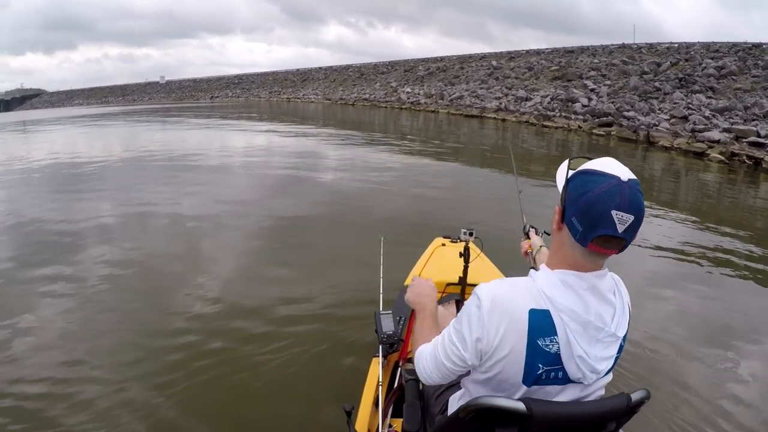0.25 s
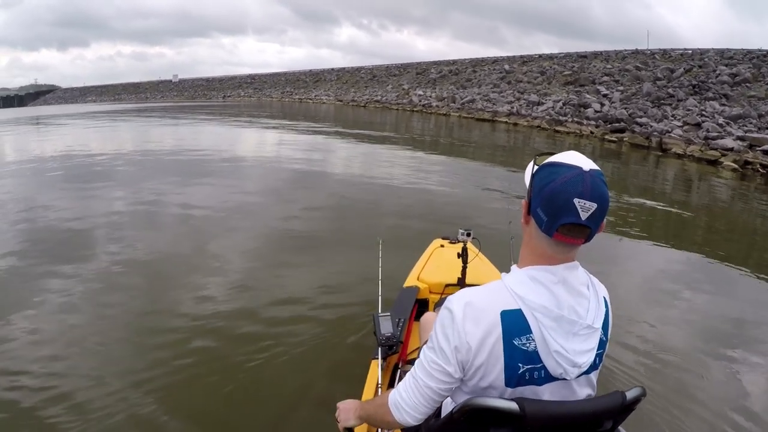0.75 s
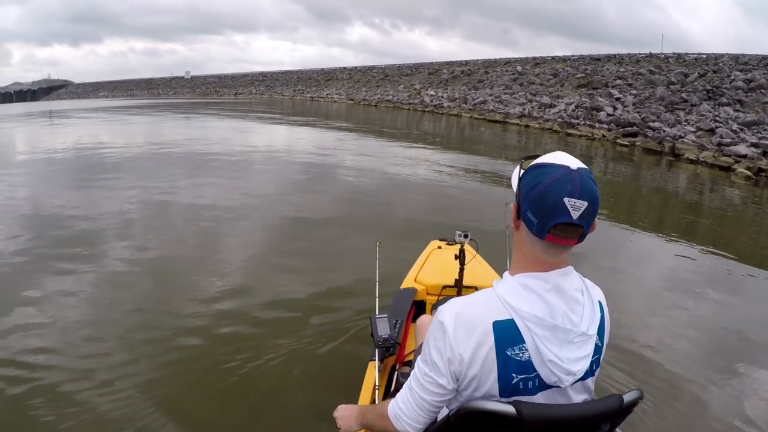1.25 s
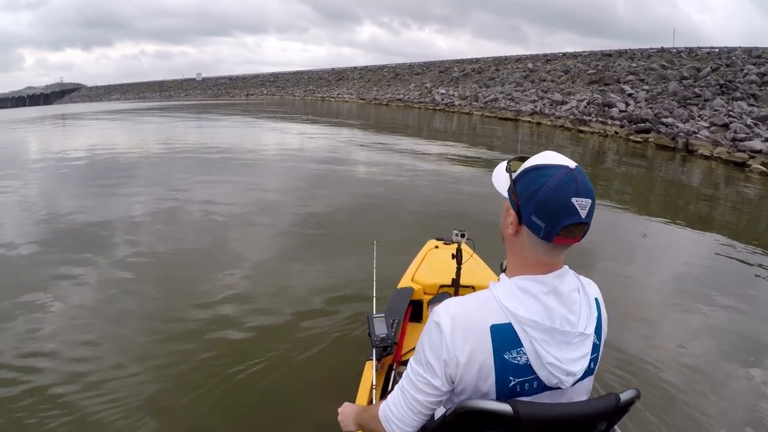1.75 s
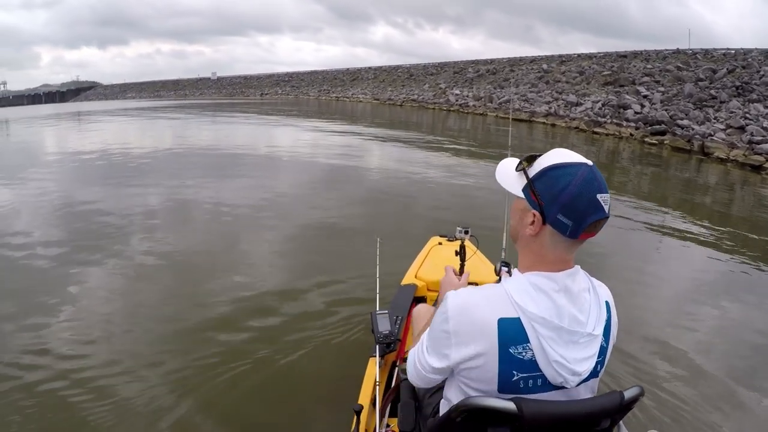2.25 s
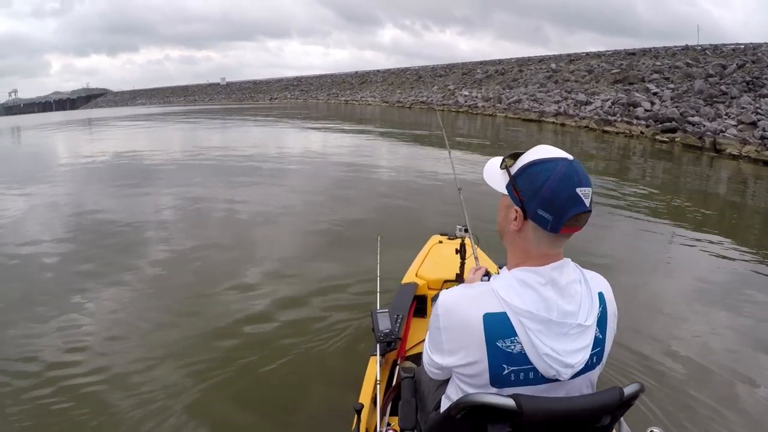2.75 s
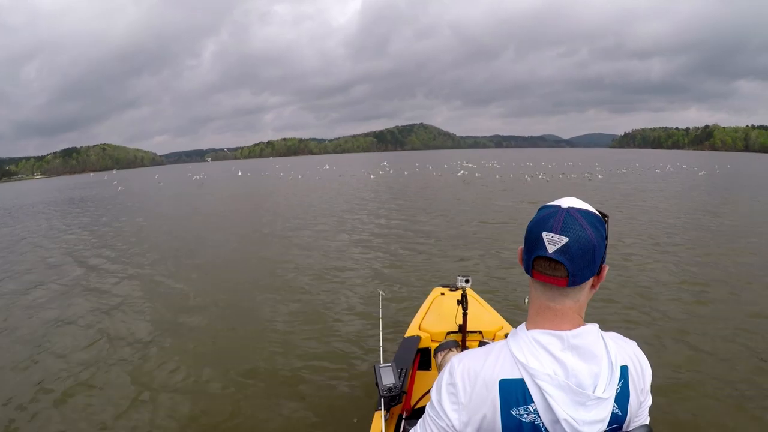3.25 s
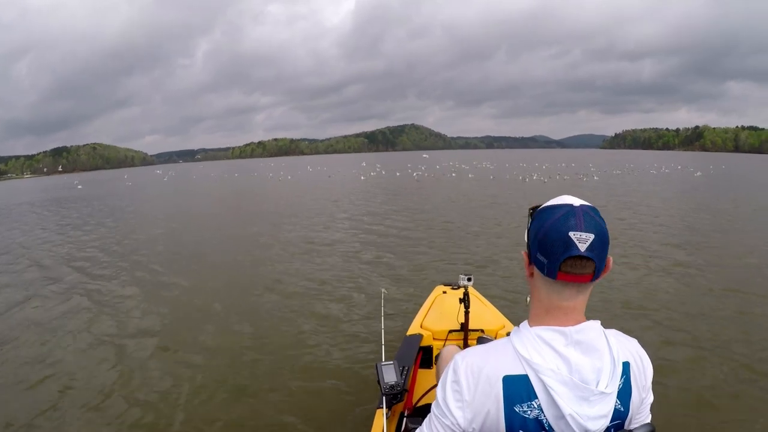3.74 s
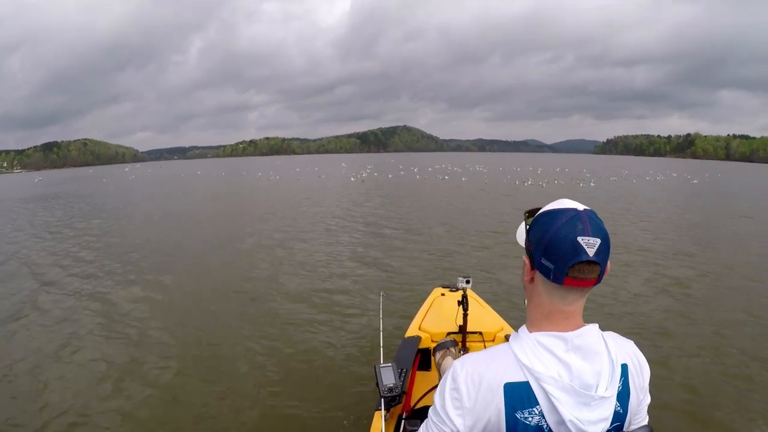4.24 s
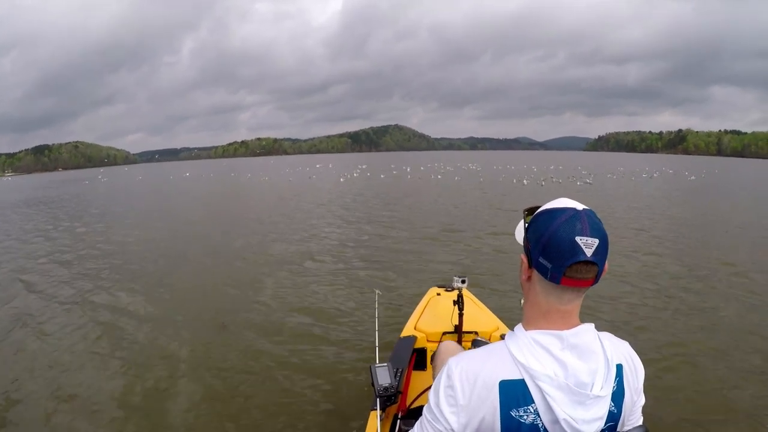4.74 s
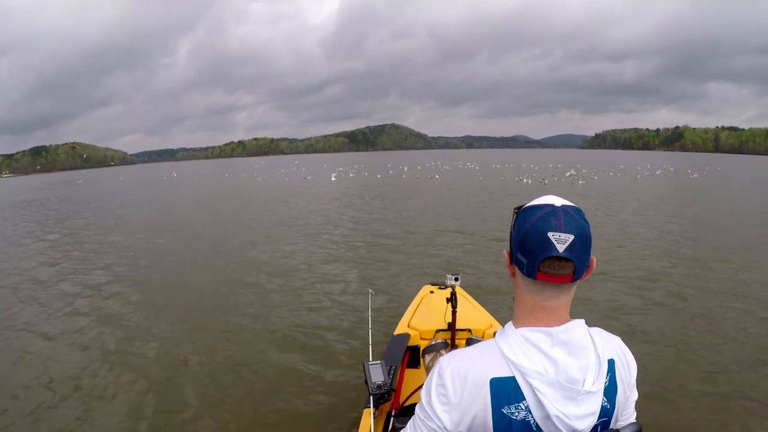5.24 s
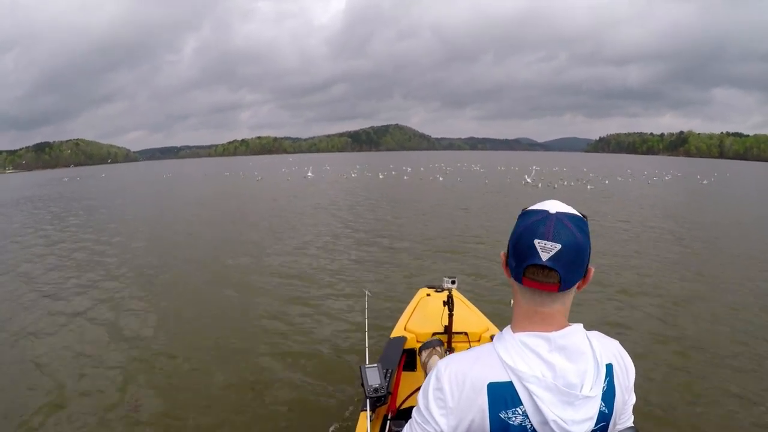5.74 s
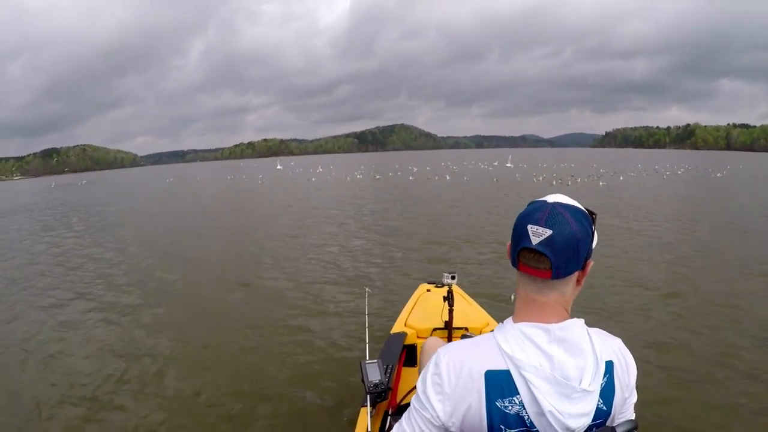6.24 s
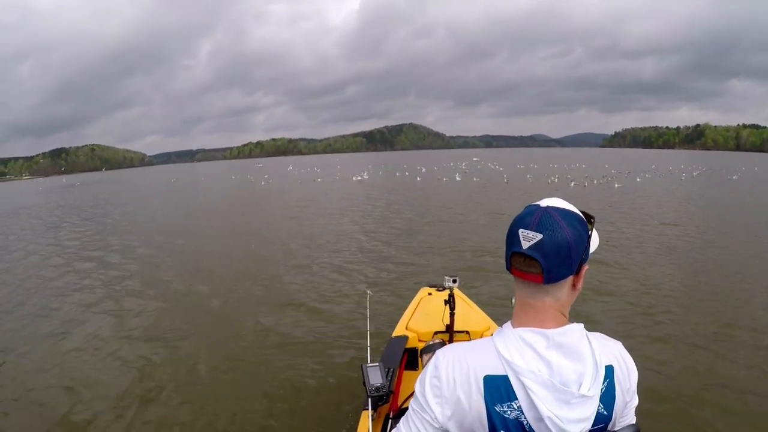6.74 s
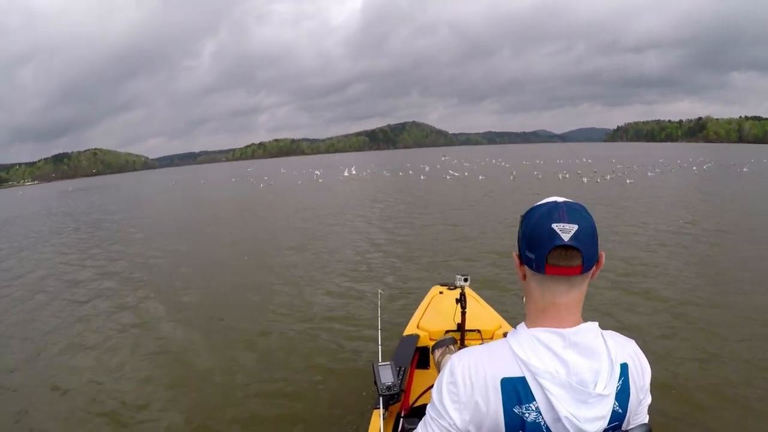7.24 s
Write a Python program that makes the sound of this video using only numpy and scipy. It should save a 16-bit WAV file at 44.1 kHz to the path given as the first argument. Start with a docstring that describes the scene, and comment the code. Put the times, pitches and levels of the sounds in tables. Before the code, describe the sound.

An angler shifts in a creaking hollow kayak; a reel catch clacks sharply, then an abrupt cut to livelier dripping water, bubbles and low wind buffeting.

```python
"""Kayak on calm water

An angler shifts in a plastic kayak: stick-slip creaks of the seat ring the hull as decaying modes, gear knocks
the deck, bright ticks are bands of noise, and the reel's catch rings metal. A sudden step clicks and recovers.
Water is noise, damped drops and bubble tones; far gulls are faint harmonic tones; light wind is slow low noise
at the microphone."""
import sys
import numpy as np
from scipy import signal
from scipy.fft import rfft, irfft, next_fast_len
from scipy.io import wavfile
from scipy.ndimage import uniform_filter1d, map_coordinates

SR = 44100
rng = np.random.default_rng(int(sys.argv[2]) if len(sys.argv) > 2 else 0)


def inscribe(sig):
    """Save sig as 16-bit PCM at rate SR to the path in sys.argv[1].

    A 1-D sig is mono; a 2-D sig holds one channel per row.
    Samples are clipped to [-1, 1] before scaling.
    """
    pcm = np.round(np.clip(np.atleast_2d(sig).T, -1, 1) * 32767)
    wavfile.write(sys.argv[1], SR, pcm.astype(np.int16))


N = 330309  # length [samples]

# one sudden step of the waveform: (time [s], peak level [dB], recovery time constant [s])
STEP = (3.1886, -27.5, 0.0083)


def amp(db):
    """Amplitude ratio: 20 dB is a factor of ten."""
    return 10 ** (np.asarray(db) / 20)


def unit(x):
    """Normalization: x scaled to rms 1."""
    return x / np.sqrt(np.mean(x ** 2) + 1e-20)


def curves(rows):
    """Linear interpolation: one value per sample for each column after the time."""
    s, *cols = np.transpose(rows)
    return [np.interp(np.arange(N) / SR, s, c) for c in cols]


def wobble(rate):
    """Slow random modulation: a smooth curve through rate random knots a second."""
    knots = rng.standard_normal(int(N * rate / SR) + 4)
    return map_coordinates(knots, [np.arange(N) * rate / SR])


def even(x, window_s):
    """Gain control: x with its chance swells levelled over the window, rms 1."""
    power = uniform_filter1d(x ** 2, size=int(window_s * SR))
    return unit(x / np.sqrt(np.abs(power) + .05))


def filtered(x, response):
    """Linear filtering: the spectrum of x times a response of frequency."""
    m = next_fast_len(len(x) + SR)  # zero padding leaves room for the tail
    return irfft(rfft(x, m) * response(np.fft.rfftfreq(m, 1 / SR)), m)[:len(x)]


def coloured(x, spectrum):
    """Spectral shaping: x follows (frequency [Hz], level [dB]) points on a log axis, rms 1."""
    f, db = np.transpose(spectrum)
    return unit(filtered(x, lambda hz: amp(np.interp(np.log(hz + .1), np.log(f + .1), db))))


def rush(spectrum, patchy_db):
    """Turbulent noise: rms 1, with patches of random gain in time and frequency."""
    z = signal.stft(rng.standard_normal(N + 512), nperseg=512)[2]
    field = uniform_filter1d(rng.standard_normal(z.shape), size=6, axis=0)
    field = uniform_filter1d(field, size=10, axis=1)
    patchy = signal.istft(z * amp(patchy_db * unit(field)), nperseg=512)[1][:N]
    return coloured(patchy, spectrum)


def band(centre_hz, width_hz):
    """Band-limited noise: one broad resonance, rms 1."""
    return unit(filtered(rng.standard_normal(N), lambda hz: 1 / (1 + ((hz - centre_hz) / width_hz) ** 4)))


def add(track, s, db, sound):
    """Superposition: mixes a sound in at time s with the given peak level."""
    part = track[round(s * SR):][:len(sound)]
    part += amp(db) * sound[:len(part)] / np.max(np.abs(sound))


def ring(modes, tilt_db, scatter_db, lag):
    """Modal decay with dispersion: bending waves are slower at low pitch, so low modes swell later."""
    hz, db, t60 = np.transpose(modes)[:, :, None]
    t = np.arange(SR // 8) / SR
    # tilt in dB per octave about 900 Hz, a random level for each mode
    level = db + tilt_db * np.log2(hz / 900) + scatter_db * rng.standard_normal(hz.shape)
    swell = 1 - np.exp(-(t * hz / lag) ** 2)  # lag in cycles
    return np.sum(amp(level - 60 * t / t60) * swell * np.sin(2 * np.pi * hz * t), axis=0)


def droplets(rate, pitch_hz, cycles, spread_db, rise):
    """Damped oscillators at random times, rate a second, a few much larger than the rest; rms 1."""
    when, pitch, size = rng.random((3, int(rate * N / SR), 1))
    hz = pitch_hz * 3 ** (2 * pitch - 1)  # from a third to three times the middle pitch
    k = np.arange(800)
    age = k * hz / SR  # in cycles
    grain = amp(-spread_db * np.log(size + 1e-4)) * np.exp(-age / cycles) * (1 - np.exp(-age))
    grain *= np.sin(2 * np.pi * age * (1 + rise * age / cycles))
    start = (when * N).astype(int)
    return unit(np.bincount((start + k).ravel(), grain.ravel(), N + 800)[:N])


def seat():
    """Stick-slip: each slip of the seat frame cracks and strikes the hull at nearly the same spot."""
    # slips of the frame: (time [s], peak level [dB])
    slips = [(.207, -46.5), (.244, -43), (0.301, -42.5), (.36, -44.5), (.403, -45), (.432, -41.5),
             (.457, -41), (.48, -43), (.504, -39.5), (.529, -41), (.554, -39.5), (.578, -40), (0.604, -39),
             (0.635, -37.5), (0.721, -37), (.833, -42.5), (0.945, -45.5), (1.8, -45.5), (1.824, -47),
             (1.922, -44), (2.145, -52), (2.176, -46.5), (2.228, -43.5), (2.466, -41), (2.504, -42),
             (2.536, -41.5), (2.57, -42.5), (2.616, -47.5), (2.676, -51), (2.727, -48.5), (2.773, -45),
             (2.836, -45), (3.255, -45), (3.325, -46), (3.39, -44.5), (3.419, -45.5), (3.444, -43),
             (3.532, -41), (3.875, -44.5), (3.946, -45.5), (4.055, -41), (4.452, -47), (4.491, -45.5),
             (4.555, -47.5), (4.617, -44.5), (4.66, -47), (4.698, -44.5), (4.715, -44), (4.766, -42),
             (5.122, -41), (5.148, -43.5), (5.176, -42.5), (5.243, -44), (5.306, -50), (5.34, -57),
             (5.407, -42.5), (5.843, -54), (5.879, -51), (5.898, -43), (5.978, -43.5), (6.044, -44),
             (6.104, -39.5), (6.155, -42), (6.242, -40.5), (6.574, -44), (6.604, -45.5), (6.637, -47),
             (6.685, -44), (6.733, -42.5), (6.784, -42), (6.866, -39), (6.915, -41.5), (6.957, -37),
             (6.974, -38), (6.995, -40), (7.072, -43), (7.457, -47)]
    # modes of the hull: (frequency [Hz], relative level [dB], t60 [s])
    hull = [(325, -6.5, 0.068), (472.7, 0.5, 0.059), (549, 0.5, 0.06), (657, 2, 0.045), (882.4, 3.5, 0.042),
            (1084.7, 5.5, 0.033), (1232, 10, 0.018), (1408, 6, 0.023), (1810, 5, 0.0098), (2156, -7, 0.025),
            (2460, -8, 0.021), (3000, -10, 0.018), (3680, -13, 0.024), (4200, -17, 0.017)]
    # colour before and after the step: (brightness [dB per octave], boost below 800 Hz [dB])
    slip_colour = [(0, 3.5), (-3, -2.5)]
    out, t = np.zeros(N), np.arange(SR // 8) / SR
    for s, db in slips:
        tilt_db, boom_db = slip_colour[int(s > STEP[0])]
        modes = [(hz, level + boom_db * (hz < 800), t60) for hz, level, t60 in hull]
        body = ring(modes, tilt_db, scatter_db=1.2, lag=2.2)
        noise = uniform_filter1d(rng.standard_normal(len(t)), size=5)
        crack = amp(rng.normal(-8, 1.5) - 60 * t / .009) * noise
        add(out, s, db, body / np.max(np.abs(body)) + crack)
    return out


def knocks():
    """Convolution of force and response: gear scuffs the deck at varying spots and excites its modes."""
    # soft knocks: (time [s], peak level [dB], brightness [dB per octave], scuff decay time constant [s],
    # favoured pitch [Hz])
    knock_rows = [(1.268, -42, -4, 0.0046, 700), (1.573, -47.5, -2, 0.0022, 2000),
                  (1.585, -40, -2, 0.0026, 420), (1.602, -36, -1, 0.0058, 700),
                  (1.62, -47.5, -2, .005, 250), (1.63, -48, -8, 0.0046, 650),
                  (1.899, -45.5, -7.5, 0.0047, 398), (1.916, -45.5, -1, 0.0033, 704),
                  (1.982, -47, 3, 0.0033, 750), (2.341, -39, 2.5, 0.00082, 1500),
                  (3.62, -40.5, -6, 0.011, 345), (3.818, -36, -2.5, 0.0014, 1580),
                  (3.822, -37.5, -3, 0.00083, 680), (3.833, -48, -2, 0.0019, 600),
                  (4.143, -43.5, -2, 0.0047, 495), (4.265, -51.5, 0, 0.0068, 400),
                  (5.936, -40, -3, 0.0016, 900), (6.348, -47, -5, 0.0033, 480),
                  (6.363, -29, -2, 0.0013, 523), (6.369, -38, 0, 0.00083, 1700),
                  (6.375, -35, -7, 0.0026, 678.5), (6.387, -39, -1, .003, 600),
                  (6.399, -43.5, -3.5, 0.0026, 750), (6.406, -46, -7, 0.0031, 500),
                  (7.223, -46, 0, .003, 1000), (7.23, -39.5, 2, 0.0017, 1150), (7.462, -49, -6, .003, 380),
                  (7.482, -45, 4, .002, 1100)]
    # modes of the deck: (frequency [Hz], relative level [dB], t60 [s])
    deck = [(203.6, -4.5, 0.059), (270.5, -3, 0.09), (413, 1.5, 0.069), (500, -1.5, 0.064),
            (686, 1.5, 0.037), (793, -4.5, 0.052), (954, -4.5, 0.039), (1145, -2.5, 0.014),
            (1660, -10, 0.019), (1943, -3.5, 0.017), (2730, -17.5, 0.013), (3440, -9, 0.015),
            (4970, -18, .01)]
    detune = .04  # random share by which the modes shift with the struck spot
    favour_db, favour_octaves = 7, .5  # boost of the modes near the favoured pitch, and its reach
    rub_gain_db, rub_s = -4, .008  # ragged noise of the contact: mid gain, decay time constant
    out, t = np.zeros(N), np.arange(SR // 25) / SR
    for s, db, tilt_db, length, favoured_hz in knock_rows:
        scuff = rng.standard_normal(len(t)) * np.exp(-t / length)
        ragged = rng.standard_normal(len(t) // 64 + 1).repeat(64)[:len(t)]
        noise = uniform_filter1d(uniform_filter1d(rng.standard_normal(len(t)), size=17), size=9)
        rub = 2 * noise * amp(rub_gain_db + 4 * ragged) * np.exp(-t / rub_s)
        spot = []
        for hz, level, t60 in deck:
            favour = favour_db * np.exp(-(np.log2(hz / favoured_hz) / favour_octaves) ** 2)
            spot.append((hz * (1 + detune * rng.standard_normal()), level + favour, t60))
        body = signal.fftconvolve(scuff, ring(spot, tilt_db, scatter_db=1.2, lag=.6))
        add(out, s, db, body / np.max(np.abs(body)) + np.pad(rub, (0, len(body) - len(t))))
    return out


def ticks():
    """Damped band noise: tackle and droplets tick as short bright cracks, each in its own band."""
    # ticks: (time [s], starting rms level [dB], centre [Hz], spread [octaves]); gain is 1/e at twice the spread
    tick_rows = [(0.156, -55, 13500, 0.28), (0.9768, -50, 3800, 0.81), (1.051, -57.5, 6170, 0.55),
                 (1.27, -57.5, 3900, 0.42), (1.374, -58.5, 4900, 0.39), (1.571, -49.5, 4540, 0.31),
                 (1.582, -56, 4800, 0.26), (1.589, -61, 4500, 0.66), (1.599, -47.5, 5070, 0.77),
                 (1.618, -55, 5300, 0.38), (1.641, -62, 4100, 0.34), (1.742, -60, 5500, 0.4),
                 (1.992, -59, 4700, 1), (2.007, -59, 9800, 0.2), (2.342, -53, 4600, 0.46),
                 (3.419, -59, 4900, 0.8), (3.5516, -56, 5000, 0.76), (3.626, -54.5, 5300, 0.75),
                 (3.8186, -52, 5400, 0.87), (4.1695, -55, 8400, 0.82), (4.377, -59.5, 3460, 0.32),
                 (4.449, -58, 3700, 0.54), (4.545, -60, 4700, 0.11), (4.715, -54, 4600, 1),
                 (4.742, -60, 4500, 0.31), (4.8623, -61, 3800, 0.83), (5.0325, -49, 14200, 0.12),
                 (5.165, -59, 4500, 0.41), (5.187, -55, 5100, 0.9), (5.196, -51, 3460, 0.3),
                 (5.225, -50.5, 4480, 0.35), (5.234, -49.5, 3900, 0.76), (5.2612, -53.5, 3800, 0.8),
                 (5.301, -54, 4150, 0.27), (5.311, -53, 7200, 0.36), (5.343, -57, 4400, 0.57),
                 (5.389, -57, 4900, 0.98), (5.411, -58, 3800, 0.82), (5.479, -64, 4900, 0.12),
                 (5.7908, -58, 4050, 0.71), (5.825, -53, 6200, 0.2), (5.8435, -55, 3900, 0.88),
                 (6.354, -50, 4200, 0.39), (6.3615, -52, 3700, 0.66), (6.369, -48, 4300, 0.86),
                 (6.385, -57, 4500, 0.37), (6.449, -54, 7600, 0.77), (6.471, -55, 9700, 0.83),
                 (6.479, -56, 6300, 0.36), (6.5643, -54.5, 4440, 0.6), (6.866, -57, 3800, 0.7),
                 (6.954, -60, 3900, 0.69), (7.055, -61, 3500, 0.27), (7.0808, -50, 6700, 1.1),
                 (7.097, -53.5, 5400, 0.51), (7.112, -57, 6000, 0.98), (7.231, -52, 4700, 0.76),
                 (7.294, -59, 5260, 0.91), (7.451, -56, 6300, 0.55)]
    out, t = np.zeros(N), np.arange(1024) / SR
    hz = np.fft.rfftfreq(len(t), 1 / SR) + 1
    for s, db, centre_hz, octaves in tick_rows:
        bell = np.exp(-(np.log2(hz / centre_hz) / octaves / 2) ** 2)
        crack = irfft(rfft(rng.standard_normal(len(t))) * bell)
        out[round(s * SR):][:len(t)] += amp(db - 60 * t / .021) * unit(crack)  # t60 of 0.021 s
    return out


def step_click():
    """Exponential relaxation: a sudden step clicks and recovers."""
    out = np.zeros(N)
    s, db, recovery = STEP
    add(out, s, db, np.exp(-np.arange(SR // 5) / SR / recovery))
    return out


def reel_catch():
    """Modal ringing: the catch lifts and drops, sounding the metal frame with a noisy rattle."""
    # the lift and the drop: (time [s], peak level [dB])
    snaps = [(2.956, -41.5), (2.9702, -7)]
    # modes of the metal frame: (frequency [Hz], relative level [dB], t60 [s])
    frame = [(603, -20, 0.029), (1030, -24, .04), (1920, -35.5, 0.11), (2100, -24, .03), (2660, -8, 0.021),
             (3430, -20, 0.028), (3640, -11, 0.023), (4280, -16.5, 0.014), (4565, -10.5, 0.016),
             (5420, -15.5, 0.019), (6390, 9, 0.012), (6750, -15.5, 0.0354), (7980, -25.5, 0.024),
             (8400, -5, 0.014), (8560, -5.5, 0.019), (10070, -11.5, .022), (11240, -8, 0.0097),
             (13400, -10, 0.00486), (14000, -4, 0.025)]
    out, t = np.zeros(N), np.arange(SR // 8) / SR
    for s, db in snaps:
        metal = ring(frame, 0, scatter_db=.8, lag=.3)
        bright_noise = np.convolve(rng.standard_normal(len(t)), [1, 0, -1], "same")
        add(out, s, db, metal + amp(-5 - 60 * t / .028) * bright_noise)
    return out


def reel_whirr():
    """Resonant noise: the spool whirrs near the frame's main mode, swelling quickly and then fading."""
    start_s, level_db, rise_s, fade_db_per_s = 3.08, -67, .015, 50
    now = np.arange(N) / SR
    turning = np.clip((now - start_s) / rise_s, 0, 1) * (now < STEP[0])
    gain = amp(level_db - fade_db_per_s * np.abs(now - start_s))
    return turning * gain * band(centre_hz=6600, width_hz=480)


def thin_hiss():
    """Band-limited noise: a thin high hiss in two bands fades out early."""
    end_s, fade_s, high_db, low_db = 0.59, 0.32, -67, -76.5
    running = np.clip((end_s - np.arange(N) / SR) / fade_s, 0, 1)
    high = amp(high_db) * band(centre_hz=14400, width_hz=1200)
    low = amp(low_db) * band(centre_hz=8340, width_hz=990)
    return running * (high + low)


def hull_water():
    """Turbulence and drop resonance: wash and hiss along the hull, sprinkled with damped drops."""
    # wash along the hull: (time [s], level before lapping [dB])
    wash_levels = [(0, -61), (.5, -62.5), (1.04, -62.5), (1.96, -62), (2.4, -62.5), (2.7, -61), (3.38, -64),
                   (4.0, -69), (4.4, -67.5), (5.0, -67.5), (5.3, -66), (5.6, -65.5), (6.34, -66),
                   (6.94, -62.5), (7.49, -66)]
    # wash spectrum: (frequency [Hz], relative level [dB per Hz])
    wash_spectrum = [(210, -21), (350, -4.5), (450, -7), (590, -7), (725, -10.5), (845, -13.5), (3000, -22),
                     (3900, -48), (6600, -120)]
    # hiss spectrum: (frequency [Hz], relative level [dB per Hz])
    hiss_spectrum = [(1290, -39.5), (2200, -24), (3220, -1), (5220, -1.5), (5860, -2.5), (12600, -2.5),
                     (14700, -3), (15300, -15), (16000, -35)]
    wash_db, = curves(wash_levels)
    hiss_db = -70.5 + .058 * (wash_db - wash_db.mean())  # the hiss follows the wash only slightly
    drops = droplets(rate=400, pitch_hz=2200, cycles=4.5, spread_db=2.5, rise=0)
    lap_db = 1.5 * wobble(9)
    wash = rush(wash_spectrum, patchy_db=.8) + amp(-7) * coloured(drops, wash_spectrum)
    hiss = rush(hiss_spectrum, patchy_db=.4) + amp(-11) * coloured(drops, hiss_spectrum)
    return amp(wash_db + lap_db) * unit(wash) + amp(hiss_db + .4 * lap_db) * unit(hiss)


def bubbles():
    """Bubble resonance: each bubble sings one tone that glides in pitch, slightly unsteady, and dies away."""
    # bubbles: (time [s], peak level [dB], start pitch [Hz], end over start pitch [ratio], length [s])
    bubble_rows = [(1.05, -50.5, 710, 0.98, 0.02), (3.275, -59, 1950, 0.94, 0.0057),
                   (3.651, -48.5, 1430, 1.13, .0076), (3.665, -45.5, 250, 1.17, 0.024),
                   (3.688, -60, 1380, 1.03, 0.017), (4.013, -57.5, 2650, 1, .01),
                   (4.153, -57, 2120, 1, .012), (4.327, -57.5, 1950, 1.1, .0087),
                   (4.604, -61.5, 1530, 1.3, 0.012), (4.731, -48.5, 700, 1.74, 0.032),
                   (4.937, -59.5, 2330, 1.3, .015), (5.112, -52, 2050, 1.06, 0.006),
                   (5.665, -47, 880, 1.96, 0.035), (6.136, -54, 1150, 1.2, 0.025),
                   (6.5, -53, 800, .95, 0.015), (6.515, -54.5, 770, 2.6, 0.052),
                   (6.562, -60, 1650, 1.43, .016), (6.59, -59, 1120, 1.15, .02),
                   (7.047, -56, 1950, 1.14, 0.0072), (7.159, -53.5, 3480, 1.03, 0.009),
                   (7.223, -43.5, 387, 0.97, 0.035), (7.261, -50.5, 396, 0.87, 0.049),
                   (7.316, -57, 1446, 1.1, 0.018), (7.113, -56, 2900, 1.26, 0.0055)]
    pitch_waver, level_rasp = .012, .25  # rms shares
    fade_db = 7  # loss over a bubble's life, besides the closing taper
    out = np.zeros(N)
    for s, db, start_hz, climb, length in bubble_rows:
        u = np.linspace(0, 1, int(length * SR))
        waver, rasp = unit(uniform_filter1d(rng.standard_normal((2, len(u))), size=120))
        pitch = start_hz * (1 + (climb - 1) * u ** 1.61) * (1 + pitch_waver * waver)
        tone = np.sin(2 * np.pi * np.cumsum(pitch) / SR)
        envelope = (1 - np.exp(-u / 0.017)) * (1 - u ** 6.1) * amp(-fade_db * u)
        add(out, s, db, (1 + level_rasp * rasp) * tone * envelope)
    return out


def plinks():
    """Damped oscillation: each small drop rings for a few cycles, its pitch climbing slightly."""
    # drops: (time [s], peak level [dB], pitch [Hz])
    plink_rows = [(0.996, -57, 1700), (1.19, -60, 2680), (1.374, -60, 2110), (1.976, -54, 1840),
                  (1.975, -51.5, 2450), (1.991, -58, 2580), (3.622, -57, 3100), (3.784, -62, 2480),
                  (3.933, -63, 1720), (3.972, -58, 2860), (4.098, -68, 4060), (4.129, -64, 2200),
                  (4.173, -58, 2950), (4.185, -66, 3300), (4.536, -63, 2300), (4.553, -63, 3200),
                  (4.603, -64.5, 2600), (4.714, -59, 2760), (4.863, -60.5, 2580), (4.87, -60, 3250),
                  (4.92, -60, 1330), (5.138, -54.5, 1410), (5.164, -59, 4400), (5.195, -51, 2900),
                  (5.206, -56, 2170), (5.263, -55, 2750), (5.275, -58, 1690), (5.308, -56, 2370),
                  (5.335, -58, 2600), (5.341, -55, 1660), (5.392, -57, 2590), (5.5, -62, 3200),
                  (5.629, -60, 4130), (5.685, -59, 1980), (5.798, -58, 3320), (5.847, -58, 3850),
                  (5.899, -63, 3010), (5.905, -58, 2370), (5.921, -58, 3960), (6.155, -57, 3100),
                  (6.655, -62, 2300), (6.68, -60, 2940), (6.815, -63, 3400), (6.824, -59, 3750),
                  (6.954, -56, 2900), (7.253, -61, 1920)]
    cycles, rise = 8, .012  # decay constant in cycles; phase gained over it, as a share
    out, t = np.zeros(N), np.arange(SR // 25) / SR
    for s, db, hz in plink_rows:
        age = t * hz / cycles
        envelope = np.exp(-age) * (1 - np.exp(-t * hz / 2))
        add(out, s, db, envelope * np.sin(2 * np.pi * hz * t * (1 + rise * age)))
    return out


def splashes():
    """Many-bubble superposition: frothy spray and ringing bubbles swell and die away, over a faint gurgle."""
    # splashes: (time of the peak [s], peak gain [dB], rise time constant [s], fall time constant [s])
    splash_rows = [(3.28, -80, 0.017, 0.0078), (3.63, -69, 0.029, 0.037), (3.819, -63.5, 0.021, 0.0077),
                   (4.15, -69.5, 0.32, 0.038), (4.55, -72.5, 0.11, 0.62), (5.16, -67, 0.044, 0.044),
                   (5.235, -62, 0.03, 0.049), (5.34, -66, 0.035, 0.14), (5.83, -67.5, 0.19, 0.24),
                   (6.361, -66, 0.025, 0.02), (6.98, -63.5, 0.11, 0.033), (7.06, -65, 0.019, 0.067),
                   (7.23, -66, 0.0095, 0.059), (7.46, -62.5, 0.0043, 0.078)]
    # froth spectrum: (frequency [Hz], relative level [dB per Hz])
    froth_spectrum = [(300, -32), (600, -11), (1200, 10), (2500, -6.5), (5000, -20), (9000, 1),
                      (14000, -40)]
    froth_db, gurgle_db, murmur_db = -5.5, 0.5, -77.5  # froth and bubbles over spray; steady faint gurgle
    spray = droplets(rate=1100, pitch_hz=2000, cycles=4, spread_db=2.6, rise=.02)
    gurgle = droplets(rate=300, pitch_hz=1500, cycles=5, spread_db=1.8, rise=.04)
    spray += amp(froth_db) * amp(3 * wobble(70)) * rush(froth_spectrum, patchy_db=1.5)
    now = np.arange(N) / SR
    swell = np.zeros(N)
    for s, db, rise, fall in splash_rows:
        swell += amp(db) * np.exp(-np.abs(now - s) / np.where(now < s, rise, fall))
    mix = swell * spray + (amp(gurgle_db) * swell + amp(murmur_db)) * gurgle
    return (now > STEP[0]) * mix


def gulls_and_bubble_tones():
    """Harmonic series: far gulls, and short bubble tones near 1500 Hz, as rough partials on a curved pitch."""
    # gulls, and from 5.832 to 5.875 s short bubble tones:
    # (time [s], peak level [dB], start pitch [Hz], middle pitch [Hz], end pitch [Hz], length [s])
    tone_rows = [(3.592, -60, 1700, 2220, 2100, 0.025), (3.603, -50, 1415, 1336, 1160, 0.027),
                 (4.456, -53, 1680, 1630, 1560, 0.024), (4.52, -64, 1510, 1570, 1700, .02),
                 (5.216, -55, 1300, 1700, 1710, 0.021), (5.589, -58, 1450, 1540, 1660, 0.012),
                 (5.607, -51.5, 1636, 1684, 1550, 0.058), (5.809, -53, 1470, 1660, 2000, 0.013),
                 (5.832, -56, 1490, 1520, 1450, .01), (5.842, -43, 1540, 1473, 1400, 0.0084),
                 (5.854, -51, 1500, 1356, 1130, .012), (5.875, -47.5, 1480, 1590, 1500, 0.016),
                 (7.002, -49.5, 1080, 1395, 1200, 0.016), (7.055, -50, 1410, 1204, 1100, 0.024),
                 (7.076, -51, 1100, 1205, 1150, 0.017), (7.297, -56.5, 1900, 2140, 2400, .02)]
    # partials from the fundamental up: (relative level [dB])
    overtones = [13.5, -1.5, -6, -26]
    out = np.zeros(N)
    for s, db, start_hz, middle_hz, end_hz, length in tone_rows:
        u = np.linspace(0, 1, int(length * SR))
        pitch = np.polyval(np.polyfit([0, .5, 1], [start_hz, middle_hz, end_hz], 2), u)
        waver = 1 + .015 * unit(uniform_filter1d(rng.standard_normal(len(u)), size=150))
        phase = 2 * np.pi * np.cumsum(pitch * waver) / SR
        rasp = 1 + .5 * unit(uniform_filter1d(rng.standard_normal(len(u)), size=80))
        tone = sum(amp(level) * np.sin((k + 1) * phase) for k, level in enumerate(overtones))
        add(out, s, db, tone * rasp * np.sin(np.pi * u) ** 0.4)
    return out


def wind():
    """Turbulent pressure on the microphone: slow swings, lumpy buffeting and a low rumble."""
    # wind: (time [s], slow sway level [dB], buffet level [dB], rumble level before its wobble [dB])
    wind_levels = [(0.0, -28.5, -33.5, -55), (0.16, -24, -43, -55), (0.48, -31.5, -37.5, -55.5),
                   (0.68, -31.5, -46.5, -56.5), (0.82, -36, -57, -59), (1.15, -37, -59, -57),
                   (1.35, -38, -52, -55.5), (1.95, -38, -48, -53), (2.1, -40, -47.5, -57),
                   (3.09, -38, -45.5, -57.5), (3.46, -24, -44, -55), (3.8, -32.5, -39.5, -56.5),
                   (3.98, -26.5, -41.5, -59), (4.32, -28, -48.5, -57.5), (4.4, -48, -46.5, -57),
                   (4.71, -22.5, -37.5, -58), (4.94, -39.5, -54, -58.5), (5.05, -25, -42, -58),
                   (5.44, -22.5, -47.5, -58.5), (5.53, -32.5, -39, -58), (5.97, -21, -38, -54),
                   (6.11, -37.5, -35, -56.5), (6.24, -21, -40.5, -57.5), (6.7, -25.5, -45, -55.5),
                   (6.82, -29, -31.5, -58.5), (7.05, -26.5, -44, -53), (7.15, -25, -33, -54),
                   (7.22, -33.5, -50.5, -52.5), (7.41, -23, -28.5, -57.5), (7.49, -27, -56, -57)]
    # sway spectrum: (frequency [Hz], relative level [dB per Hz])
    sway_spectrum = [(.5, -11), (1.3, -6), (2.7, 3.5), (6, -2), (8.5, -6), (15, -10), (20, -32), (40, -120)]
    # buffet spectrum: (frequency [Hz], relative level [dB per Hz])
    buffet_spectrum = [(8, -120), (14, 4), (19, -7.5), (27, -9), (40, -18.5), (60, -22.5), (120, -120)]
    # rumble spectrum: (frequency [Hz], relative level [dB per Hz])
    rumble_spectrum = [(29, -36), (50, -9.5), (59, -7), (75, 0), (129, -0.5), (173, -5.5), (236, -7),
                       (450, -16.5), (580, -37.5), (990, -120)]
    sway_db, buffet_db, rumble_db = curves(wind_levels)
    sway = even(coloured(rng.standard_normal(N), sway_spectrum), window_s=.25)
    buffet = even(coloured(rng.standard_normal(N), buffet_spectrum), window_s=.1)
    lumps = unit(amp(1 * wobble(4)) * buffet)  # lumps of about 1 dB
    rumble = amp(1.2 * wobble(8)) * even(rush(rumble_spectrum, patchy_db=1), window_s=.2)
    return amp(sway_db) * sway + amp(buffet_db) * lumps + amp(rumble_db) * rumble


def scene():
    """Superposition: all sources add at one microphone."""
    contacts = knocks() + ticks() + step_click()
    reel = reel_catch() + reel_whirr() + thin_hiss()
    water = hull_water() + bubbles() + plinks() + splashes()
    return (seat() + contacts + reel + water + gulls_and_bubble_tones() + wind())[None]


def record(dry):
    """Frequency response: the microphone softens the treble and nothing passes above the band limit."""
    # response of the microphone: (frequency [Hz], gain [dB])
    mic_response = [(1, 0.5), (10000, -3), (13000, -6.5), (15300, -14.5), (16300, -35)]
    top_hz = 16300
    f, db = np.transpose(mic_response)
    return filtered(dry[0], lambda hz: amp(np.interp(hz, f, db)) * (hz < top_hz))[None]


dry = scene()
out = record(dry)
inscribe(out)
```